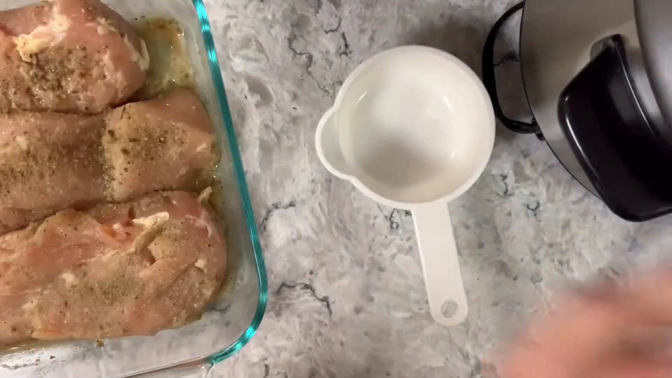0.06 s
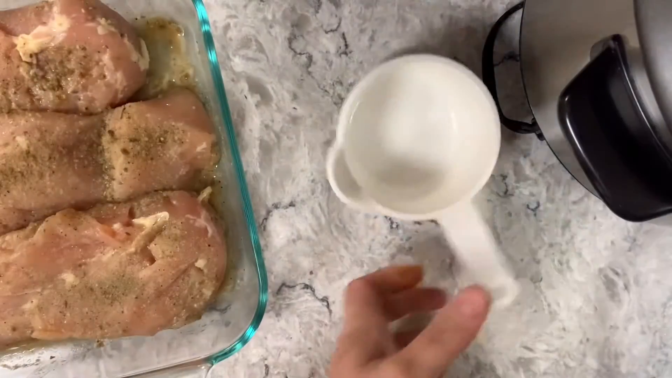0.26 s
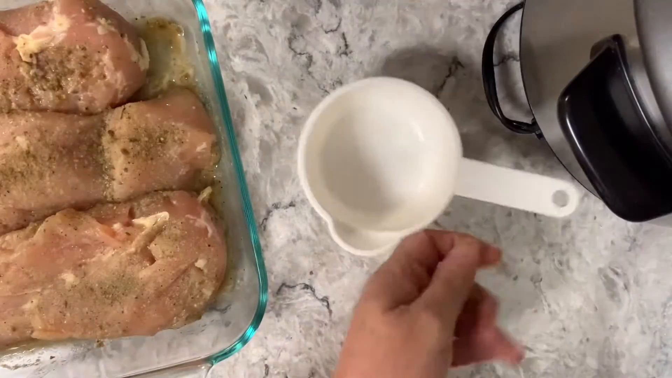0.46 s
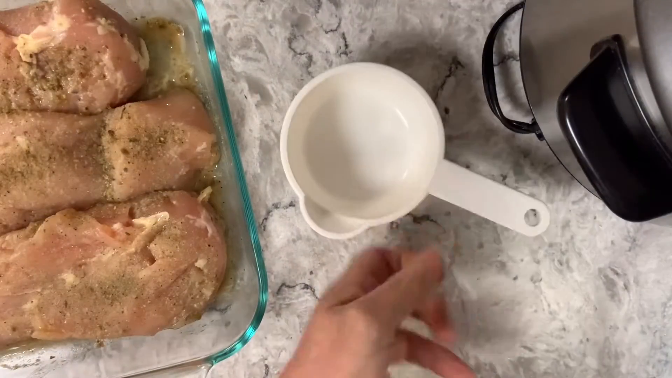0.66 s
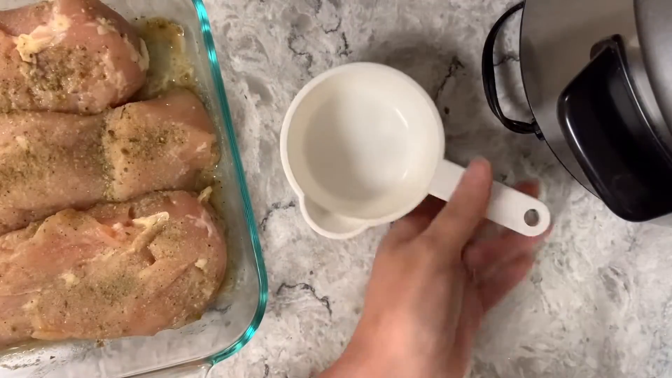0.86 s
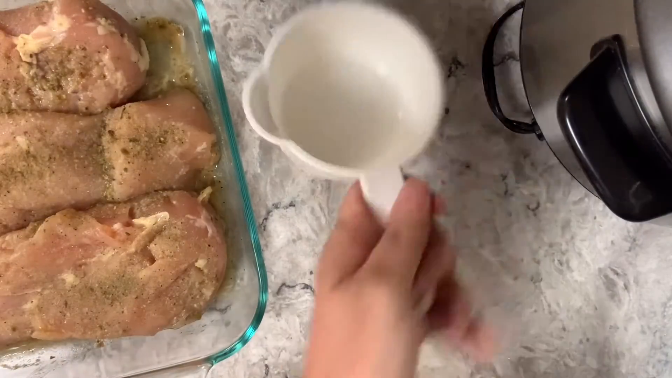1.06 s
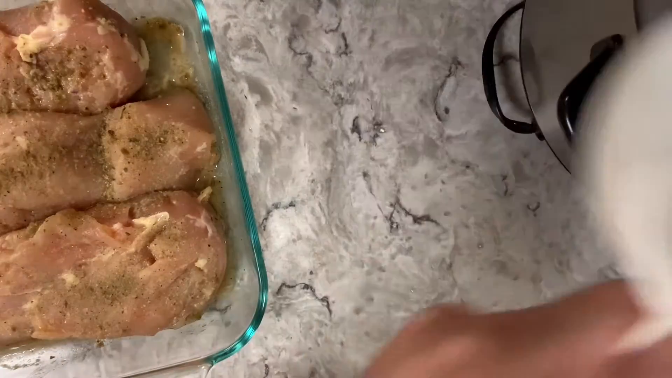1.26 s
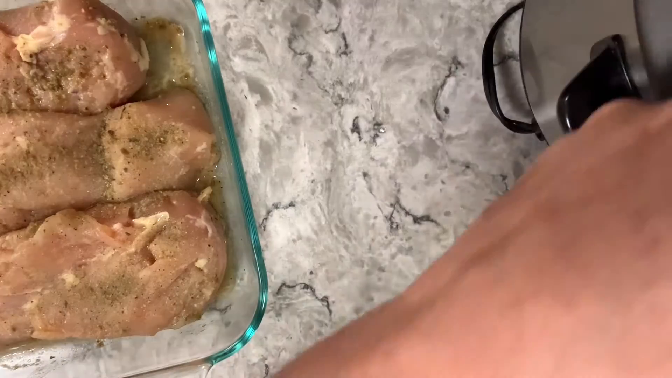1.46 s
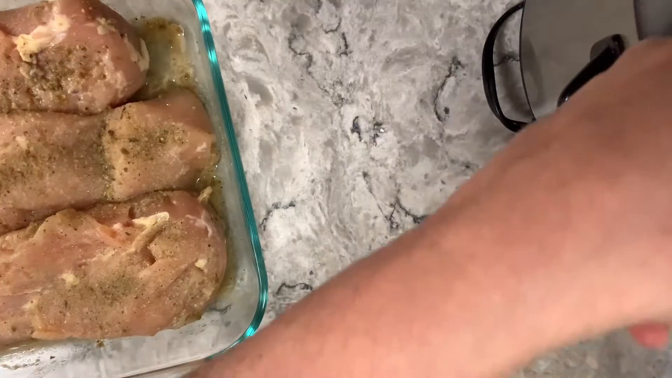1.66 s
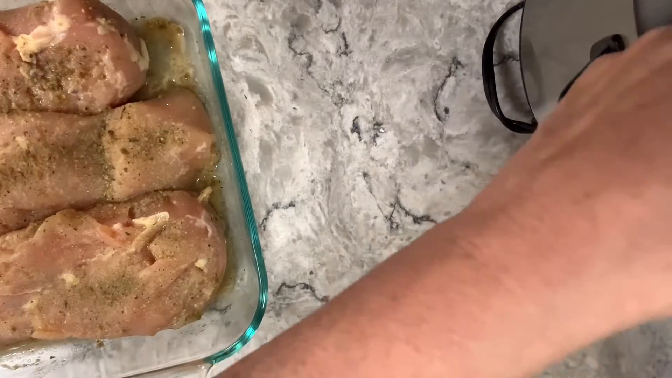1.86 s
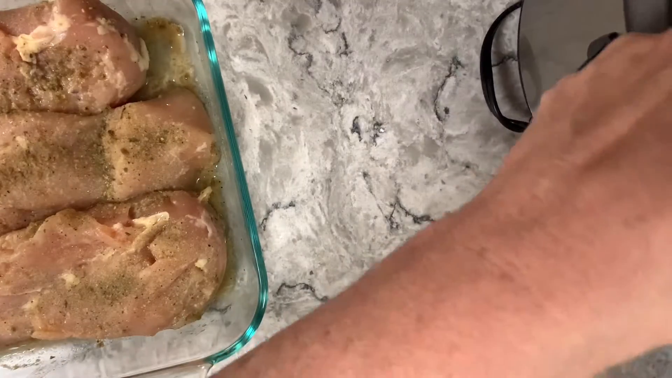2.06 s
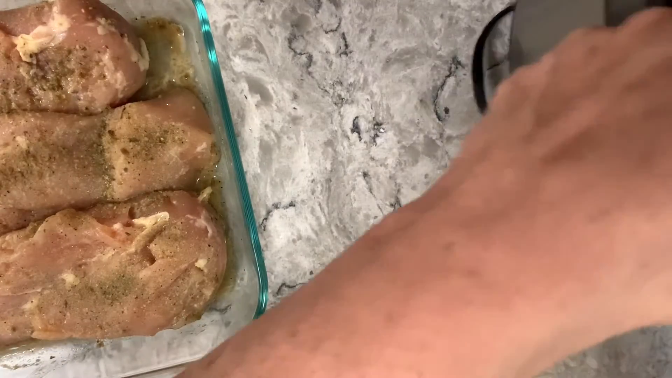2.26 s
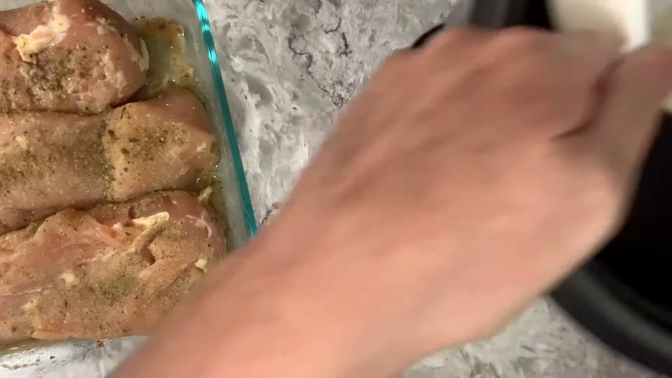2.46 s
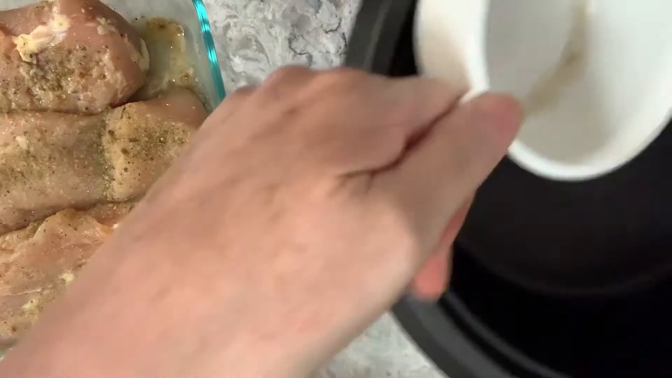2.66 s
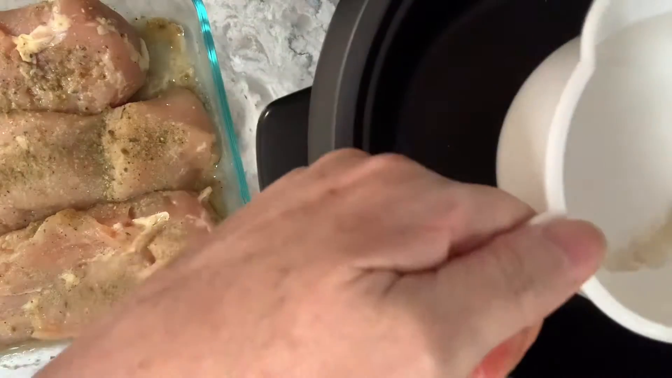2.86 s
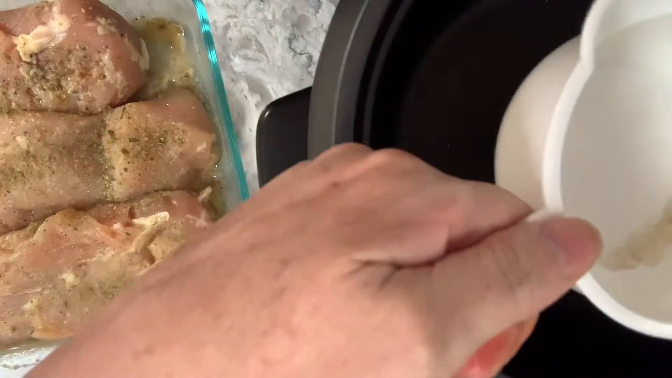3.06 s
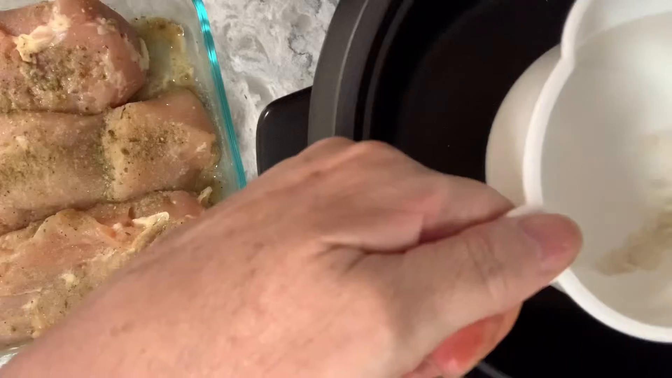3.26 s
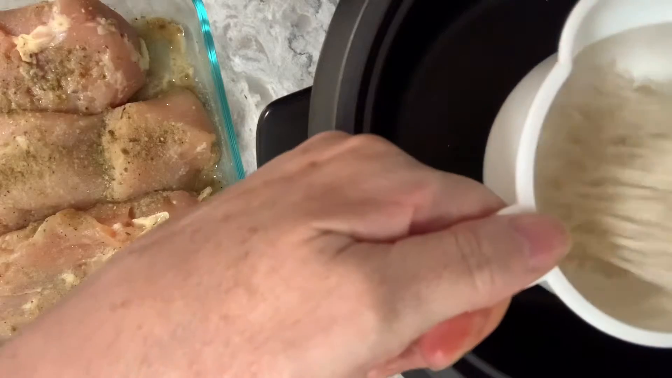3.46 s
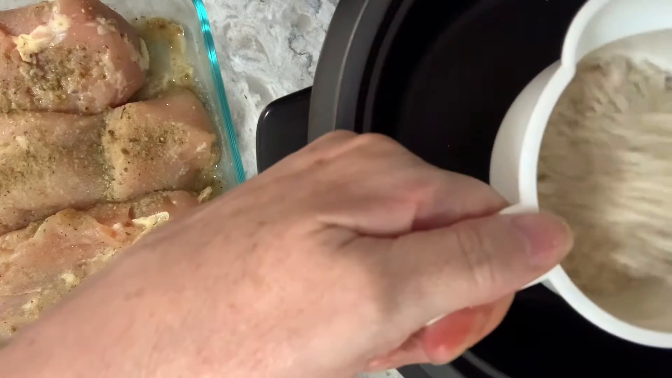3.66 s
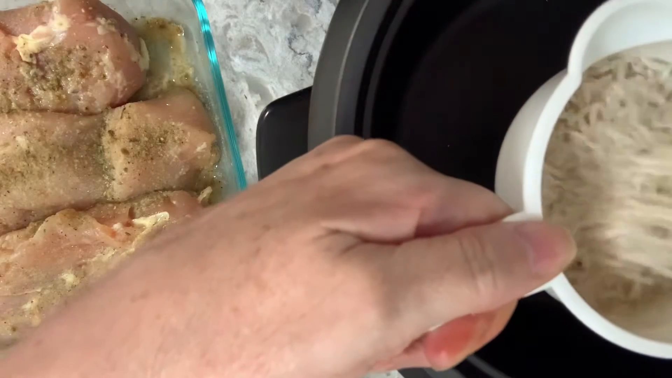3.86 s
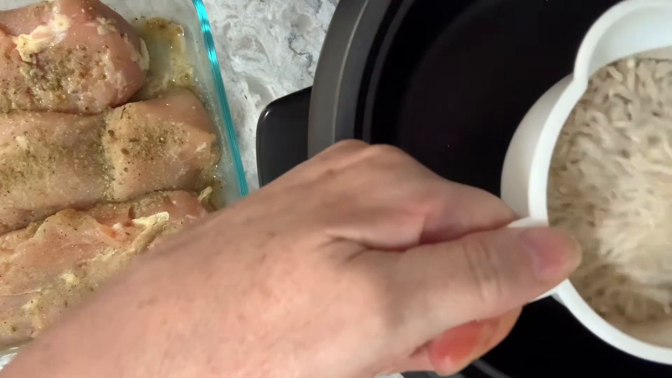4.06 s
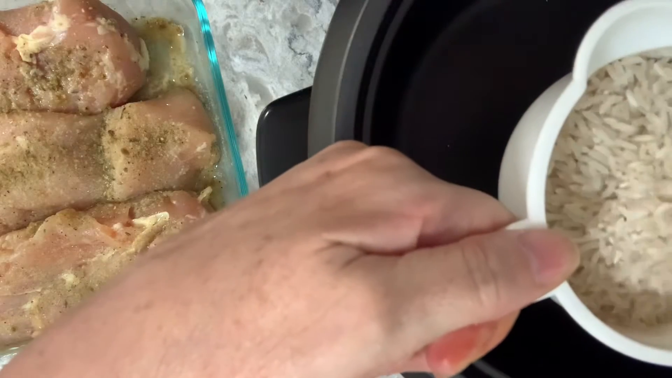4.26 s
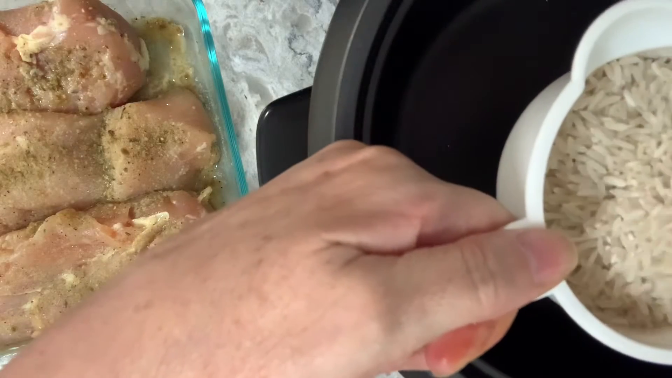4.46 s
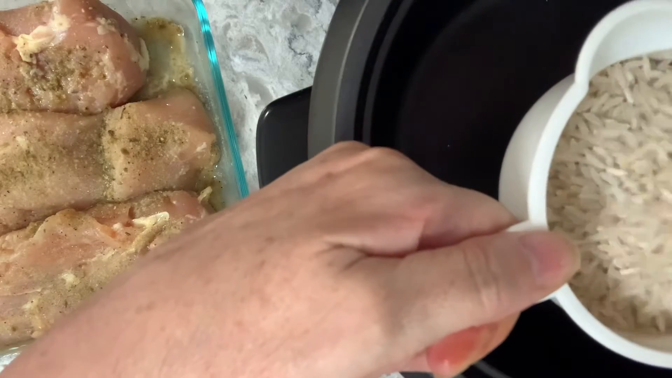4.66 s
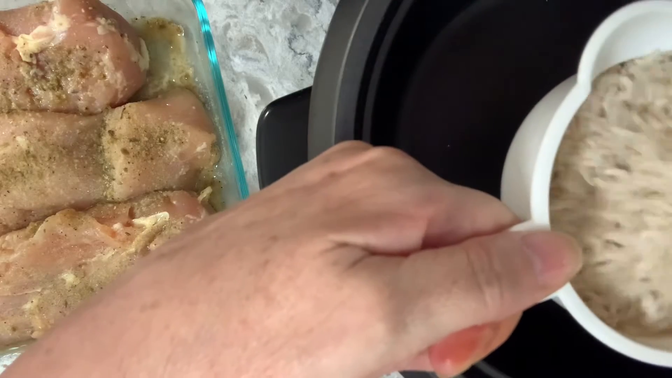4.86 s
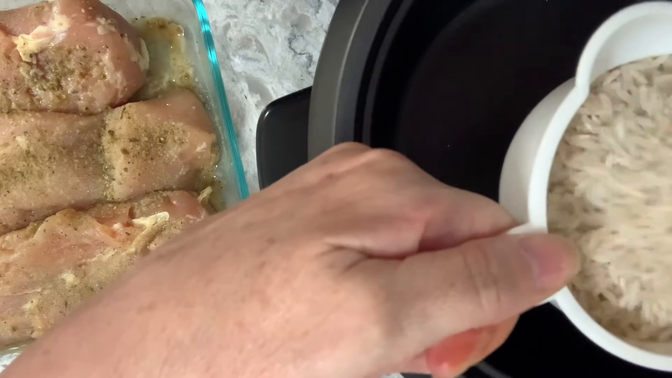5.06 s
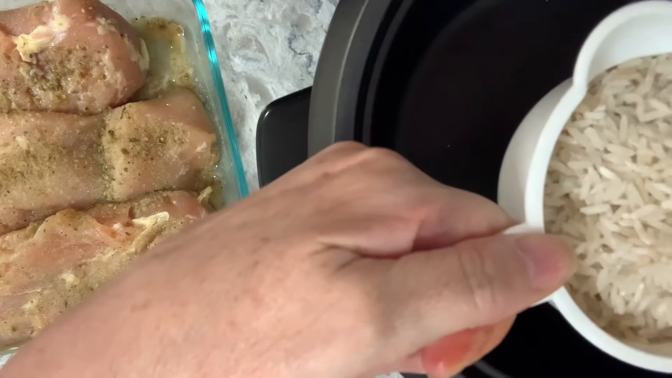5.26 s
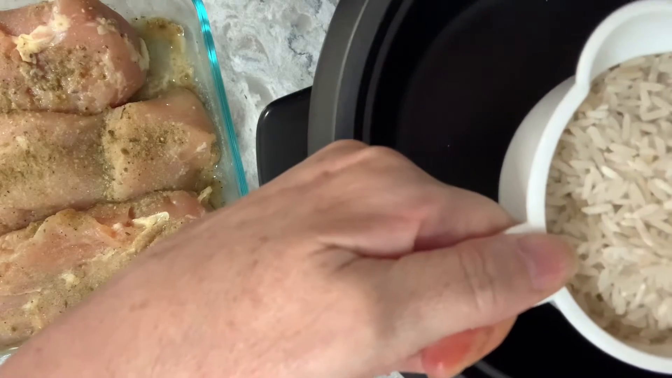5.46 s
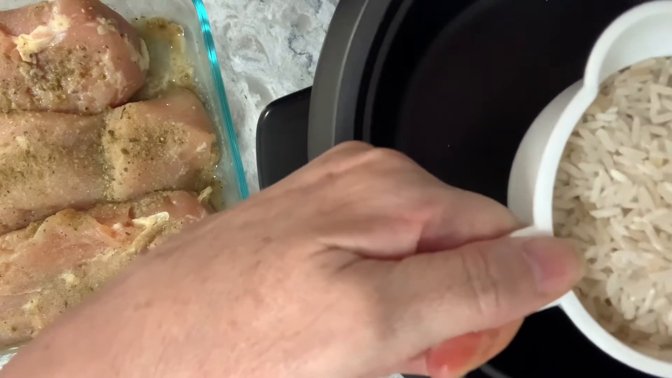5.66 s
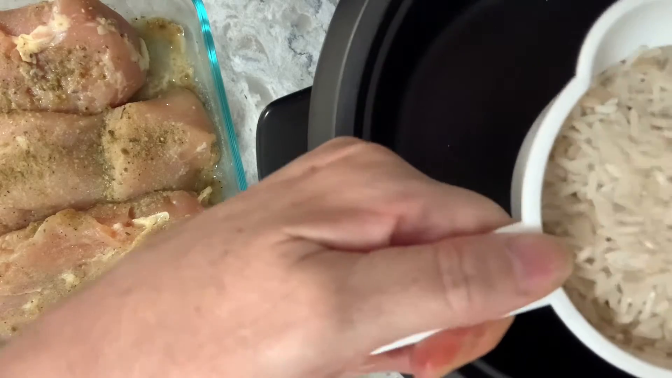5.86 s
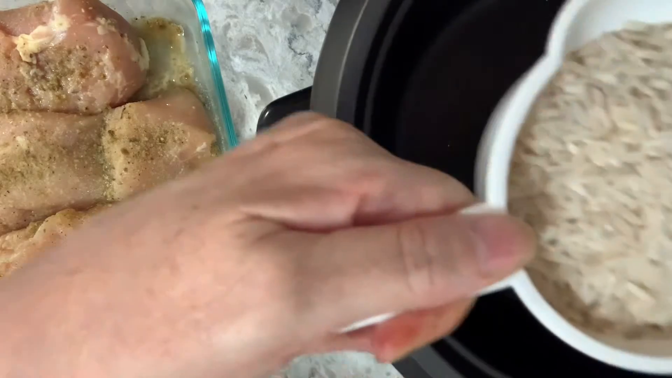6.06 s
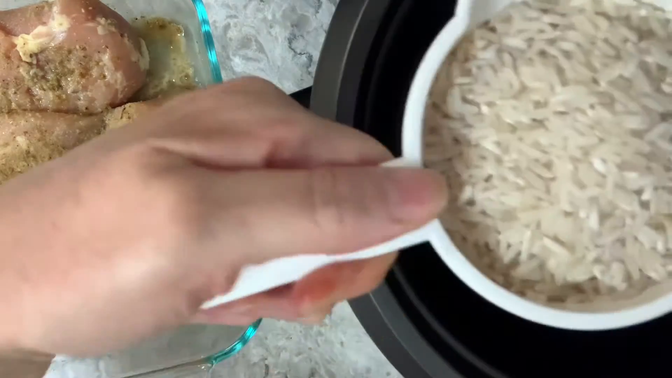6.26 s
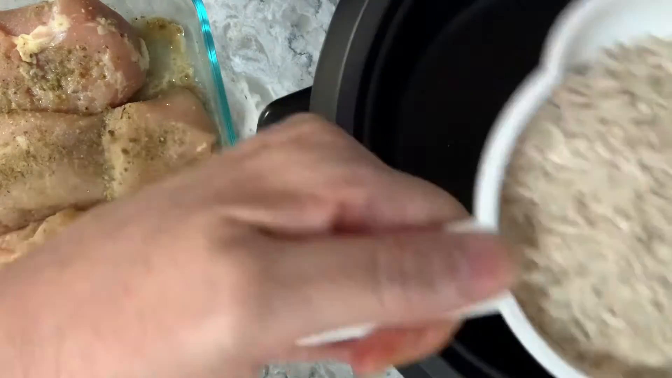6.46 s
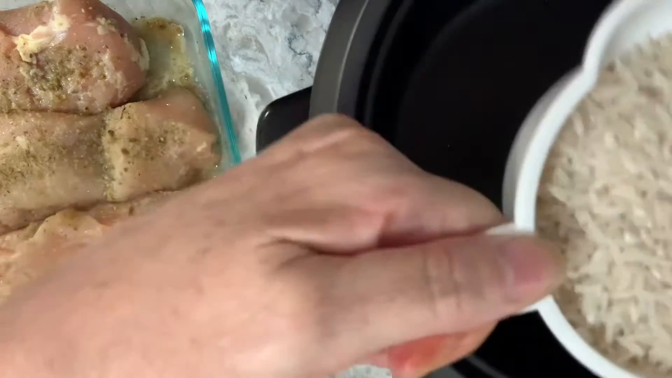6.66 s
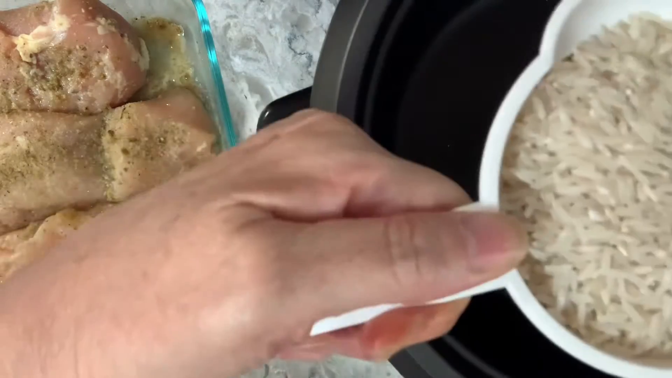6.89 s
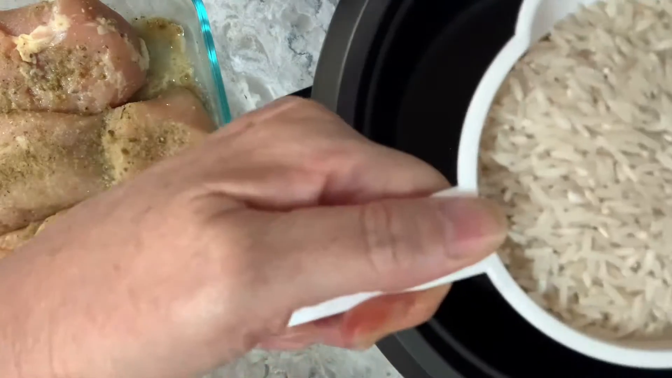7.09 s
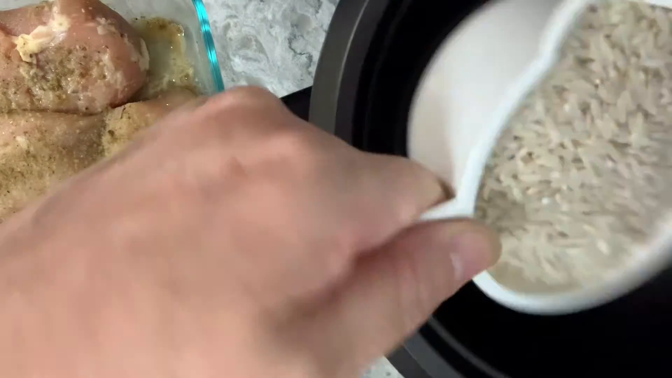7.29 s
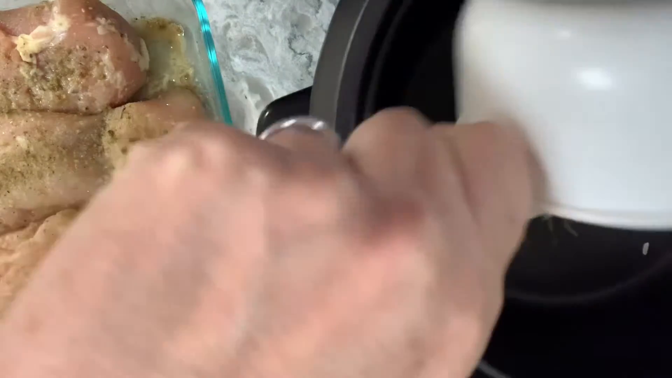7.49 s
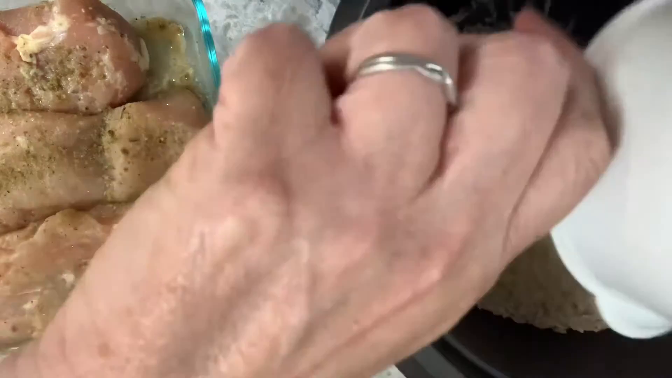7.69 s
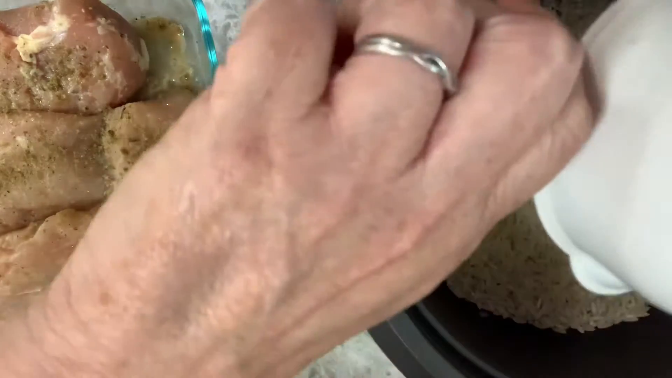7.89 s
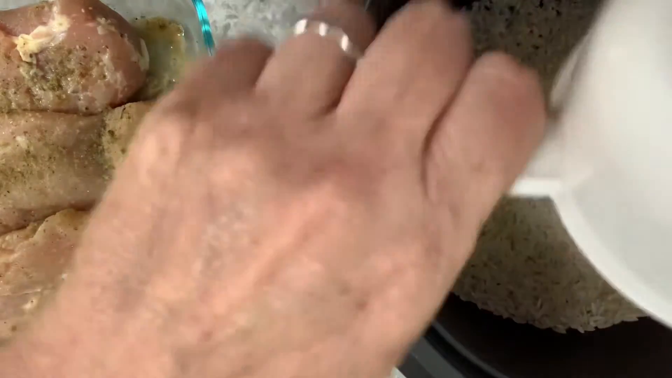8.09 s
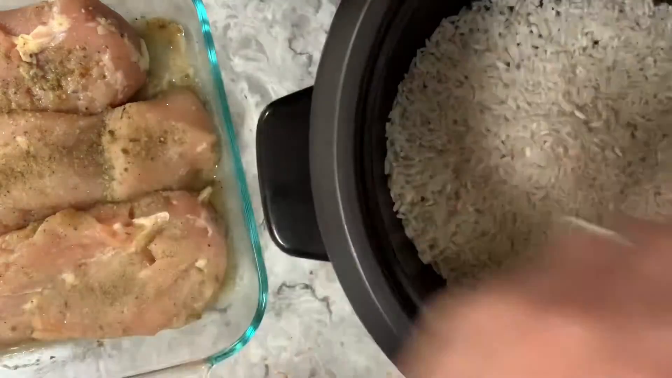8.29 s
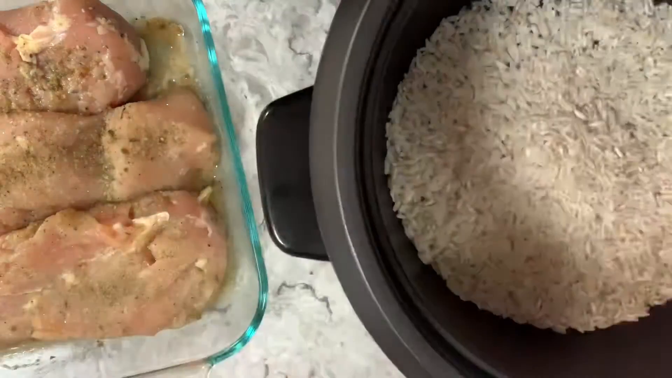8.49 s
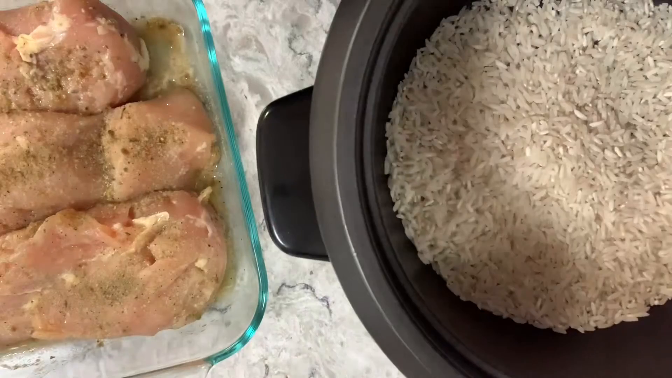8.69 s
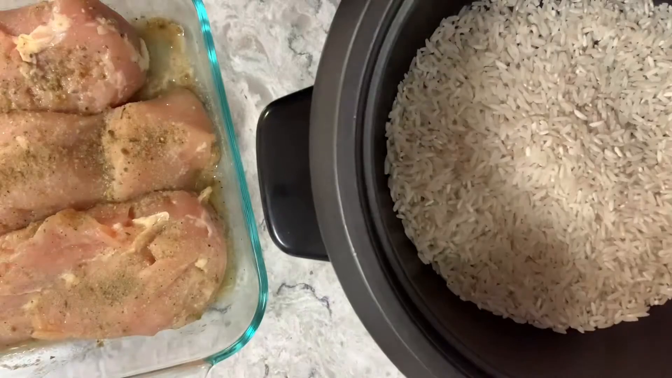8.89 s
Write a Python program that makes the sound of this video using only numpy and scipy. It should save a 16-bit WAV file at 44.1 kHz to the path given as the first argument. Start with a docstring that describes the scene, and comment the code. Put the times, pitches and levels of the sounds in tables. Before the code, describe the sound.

A faint, low rumble of a quiet kitchen runs throughout, and everything is heard close up. From about 0.2 seconds a plastic measuring cup rocks on a stone counter, clatters flat at 0.4 and slides faintly. At 1.7 a little dry rice rattles into it. A rice cooker bumps loudly at 1.9 and is dragged in two shoves, its feet sticking and slipping, until about 2.9. The cup takes dry knocks at 2.4 and 3. From 3.1 a stream of rice rings the hollow cup, dulling after 3.5 to a soft patter that thins out by 6.5, with a light knock at 5.7. At 7.4 the cupful lands in the cooker's metal pot with a loud, bright hiss and a brief ring, quickly damped by the heap, and a soft bump. A few last grains tick until about 8.3 seconds.

```python
"""A plastic measuring cup clatters on a stone counter, over the faint rumble of a quiet kitchen.
A little dry rice rattles into it, and a rice cooker is dragged closer on feet that stick and slip.
Then a stream of rice rings the cup and dulls to a patter as the grains cover its bottom.
Last, the cupful is tipped into the cooker's metal pot, which rings until the heap damps it.
A phone with two microphones hears it all from close by."""
import sys
import numpy as np
from scipy import signal
from scipy.fft import rfft, irfft, next_fast_len
from scipy.io import wavfile
from scipy.ndimage import uniform_filter1d

SR = 44100
rng = np.random.default_rng(int(sys.argv[2]) if len(sys.argv) > 2 else 0)


def store_wav(level_fs):
    """Save 16-bit WAV to argv[1]."""
    pcm = np.round(np.clip(np.atleast_2d(level_fs), -1, 1) * 32767)
    wavfile.write(sys.argv[1], SR, pcm.T.astype(np.int16))


N = 393930
TIME = np.arange(N) / SR
AGE = TIME[:SR // 3]  # seconds since a hit began


def undb(db):
    """Turn decibels into a number to multiply by."""
    return np.exp(np.asarray(db) * (np.log(10) / 20))


def unit(x):
    """Scale a sound to an average power of 1."""
    return x / np.sqrt(np.mean(x ** 2))


def fade(t60):
    """A fade that drops by 60 dB in t60 seconds."""
    return undb(-60 * AGE / t60)


def swells(rows, attack_s, sag_db_per_s, release_db_per_s):
    """The loudness of movements that build up, weaken as they last, then die away."""
    out = np.zeros(N)
    for start, length, db in rows:
        span = slice(int(start * SR), int(start * SR) + 2 * SR)
        age = np.maximum(TIME[span] - start, 0)
        level_db = db - sag_db_per_s * age - release_db_per_s * np.maximum(age - length, 0)
        out[span] += np.minimum(age / attack_s, 1) * undb(level_db)
    return out


def over_pitch(points, hz):
    """Read between the rows of a table, giving each octave equal room."""
    pitch, value = np.transpose(points)
    return np.interp(np.log(hz + 1), np.log(pitch), value)


def colour(x, tone, size=2048):
    """Give a sound a tone: the table says how strong each pitch is next to the others."""
    gain = undb(over_pitch(tone, np.fft.rfftfreq(size, 1 / SR)))
    cepstrum = irfft(np.log(gain))
    # folding this in half keeps the filter from sounding before the hit
    cepstrum[1:size // 2] *= 2
    cepstrum[size // 2 + 1:] = 0
    response = irfft(np.exp(rfft(cepstrum)))
    return signal.oaconvolve(x, response[None] / np.linalg.norm(response), axes=1)[:, :x.shape[1]]


def resonate(x, notes, size=4096):
    """Let a sound ring an object's notes; the wider a note, the sooner it dies."""
    t = AGE[:size]
    response = np.zeros(size)
    for k, (hz, width, db) in enumerate(notes):
        decay = undb(db) * np.sqrt(width) * np.exp(-np.pi * width * t)
        response += decay * np.sin(2 * np.pi * hz * t + k * np.pi / 2)
    return signal.oaconvolve(x, response[None] / np.linalg.norm(response), axes=1)[:, :N]


def wander(rate):
    """A smooth random drift of about 1 either way, turning `rate` times a second."""
    hold = max(int(SR / rate), 1)
    steps = np.repeat(rng.standard_normal(N // hold + 1), hold)[:N]
    return unit(uniform_filter1d(steps, hold))


def add(out, start_s, sound):
    """Mix a sound in at the given time."""
    i = int(start_s * SR)
    out[:, i:i + sound.shape[1]] += sound[:, :N - i]


def cracks(rows, tone, t60, rise_s):
    """Short bursts of noise, made as two things touch."""
    out = np.zeros((2, N))
    shape = fade(t60) * (1 - np.exp(-AGE / rise_s))
    for start, db in rows:
        add(out, start, 0.46 * undb(db) * shape / shape.max() * rng.standard_normal((2, len(AGE))))
    return colour(out, tone)


def blows(rows, notes, focus_db, tone, crack_t60, rise_s):
    """Each blow cracks and rings the notes near its centre pitch; a softer blow rings fewer of them."""
    hz, note_db, t60 = np.transpose(notes)
    decay = np.array([fade(t) for t in t60]) * (1 - np.exp(-AGE / rise_s))
    signs = (-1) ** np.arange(len(hz))
    out = cracks([(start, db) for start, _, _, db in rows], tone, crack_t60, rise_s)
    for start, ring_db, centre_hz, crack_db in rows:
        softness = 1.5 + max(ring_db - crack_db, 0) / 21.5  # a weak crack means a soft blow
        gain = signs * undb(note_db - focus_db * softness * np.log2(hz / centre_hz) ** 2)
        detuned_hz = hz * (1 + 0.0047 * rng.standard_normal(len(hz)))
        angle = 2 * np.pi * np.outer(detuned_hz, AGE).astype(np.float32)
        ring = np.array([gain @ (decay * np.sin(angle)), gain @ (decay * np.cos(angle))])
        add(out, start, undb(ring_db) * ring / np.abs(ring[0]).max())
    return out


def tiny_hits(rate, scatter_db, clump_db, clump_rate, rattle_t60):
    """About `rate` uneven hits a second, each with a brief rattle, swelling in random clumps."""
    chance = np.minimum(rate / SR, 1)
    size = undb(scatter_db * np.minimum(rng.exponential(size=N), 4))
    hits = rng.random(N) < chance
    power = signal.oaconvolve(hits * size ** 2 / chance, fade(rattle_t60) ** 2)[:N]
    rattle = np.sqrt(np.abs(power)) * rng.standard_normal((2, N))
    return unit(rattle * undb(clump_db * wander(clump_rate)))


# The tone of the kitchen's background. Each row: pitch in Hz, strength in dB.
KITCHEN_TONE = [(25, -19), (40, -7), (58, 4), (80, -1), (120, 0), (210, -1), (350, -6), (600, -17),
                (900, -19), (1700, -30), (4000, -36), (9000, -38), (15500, -42)]


def kitchen_rumble():
    """A faint, low noise that wavers a little and never stops."""
    level_db = -57.5 + .7 * wander(5.1)
    return undb(level_db) * colour(rng.standard_normal((2, N)), KITCHEN_TONE)


# The cup rocks. Each row: start in seconds, ring level in dB, centre pitch in Hz, crack level in dB.
CUP_ROCKING = [(.188, -42, 1250, -32.5), (.204, -37.5, 150, -50), (.209, -37, 1300, -50),
               (.219, -28.5, 1230, -40), (.348, -27.5, 950, -37.5), (.361, -30, 300, -43),
               (.389, -38, 1000, -46), (.402, -36, 1300, -40), (.409, -17, 1700, -18),
               (.419, -21, 1300, -22), (.429, -25, 1400, -37)]
# The notes of the cup on stone. Each row: pitch in Hz, strength in dB, fade time in seconds.
CUP_ON_STONE_NOTES = [(113, -2, 0.11), (212, -5, .1), (530, -6, 0.034), (874, -3.5, 0.032),
                      (1043, -2.5, 0.033), (1184, -5, .03), (1300, -4, 0.042), (1400, -4, .035),
                      (1500, -5.5, 0.032), (1850, -2, 0.026), (2130, -6, 0.023), (2430, -3.5, 0.032),
                      (2720, -9.5, .03), (4000, -4, .03)]
# The tone of plastic touching stone. Each row: pitch in Hz, strength in dB.
STONE_TONE = [(150, -24), (650, -12), (1000, 0), (1500, -2.5), (2400, -5), (3400, -8.5), (5500, -5.5),
              (8000, -10), (11000, -13.5), (15500, -24)]
# The cup slides. Each row: start in seconds, length in seconds, level in dB.
SLIDES = [(.44, .4, -57), (.86, 0.33, -55.5)]


def cup_on_counter():
    """The nudged cup rocks on the stone, drops flat so that its base rings, then slides."""
    clatter = blows(CUP_ROCKING, CUP_ON_STONE_NOTES, focus_db=1.5, tone=STONE_TONE,
                    crack_t60=0.078, rise_s=0.00054)
    base_hz, base_db, base_rise_s = 863, -22.5, 0.011
    shape = undb(base_db) * fade(t60=.12) * (1 - np.exp(-AGE / base_rise_s))
    note = np.sin(2 * np.pi * base_hz * AGE + np.array([[0], [np.pi / 2]]))
    base = np.zeros((2, N))
    add(base, start_s=.416, sound=shape * note)
    sliding = swells(SLIDES, attack_s=0.014, sag_db_per_s=39, release_db_per_s=120)
    friction = colour(rng.standard_normal((2, N)), STONE_TONE) * undb(1.3 * wander(37))
    return clatter + base + sliding * friction


COVER_STARTS_S, COVER_TAKES_S, FILL_TAKES_S = 3.41, 0.35, 2


def covered(seconds):
    """How much of the cup's bottom lies under rice, from 0 to 1."""
    return np.clip((seconds - COVER_STARTS_S) / COVER_TAKES_S, 0, 1)


# Short spurts of rice. Each row: start in seconds, length in seconds, level in dB.
RICE_DRIBBLES = [(1.669, .075, -25.5), (1.781, .05, -37), (1.94, 0.027, -35.5), (2.04, .07, -43),
                 (2.15, .2, -57.5), (6.39, 0.031, -46), (6.5, 0.083, -54.5)]
# The main pour. Each row: time in seconds, level in dB.
RICE_STREAM = [(3.19, -46.5), (3.29, -23.5), (3.41, -22.5), (3.56, -40.5), (3.7, -37.5), (3.8, -41.5),
               (3.87, -38), (4.22, -49), (4.33, -45.5), (4.43, -46.5), (4.53, -53), (4.8, -45), (4.95, -49),
               (5.25, -56.5), (5.3, -47.5), (5.42, -49), (5.47, -53), (5.58, -51.5), (5.68, -59),
               (5.96, -56.5), (6.04, -81)]
# The tone of rice landing on plastic, and on other rice. Each row: pitch in Hz, strength in dB.
ON_PLASTIC_TONE = [(200, -32.5), (700, -28.5), (1800, -18), (2400, -12.5), (2850, -10), (3600, -12.5),
                   (4700, -2.5), (7000, -4.5), (8500, -2.5), (12300, 0), (15500, -4.5)]
ON_RICE_TONE = [(200, -15), (700, -10), (1350, -10), (1750, -21), (2700, -10), (3700, -7.5), (5200, -2),
                (6100, 2), (7200, -2.5), (8800, -1), (12000, 1), (15500, -5.5)]
# The notes of the cup's bottom, the whole empty cup and the cup with rice in it.
# Each row: pitch in Hz, width in Hz, strength in dB.
CUP_BOTTOM_NOTES = [(1170, 55, -0.5), (2004, 70, -16), (2930, 120, -14.5)]
EMPTY_CUP_NOTES = [(890, 90, -14), (990, 50, -6.5), (1060, 90, -2.5), (1160, 90, -4), (1250, 66, 0),
                   (1400, 110, -8), (1700, 40, -23), (2130, 71, -19), (2400, 80, -15), (2890, 140, -10.5),
                   (3210, 70, -18.5), (4000, 140, -15), (4600, 120, -10.5), (5150, 180, -11)]
FILLED_CUP_NOTES = [(850, 130, -3), (1120, 300, -1.5), (1336, 160, 4), (1850, 250, -12), (2970, 450, -9)]


def rice_into_cup():
    """A stream rings the whole cup, a dribble only its bottom; a weaker flow has fewer grains."""
    times, levels_db = np.transpose(RICE_STREAM)
    stream = undb(np.interp(TIME, times, levels_db, left=-150, right=-150))
    dribbles = swells(RICE_DRIBBLES, attack_s=0.0072, sag_db_per_s=10, release_db_per_s=401)
    flow = stream + dribbles
    grains_per_s = 500 + 3000 * np.sqrt(flow / flow.max())
    patter = tiny_hits(grains_per_s, scatter_db=2.8, clump_db=1.1, clump_rate=63, rattle_t60=0.013)
    bounces = tiny_hits(rate=23, scatter_db=2, clump_db=1, clump_rate=11, rattle_t60=.012)
    # rice soon covers the plastic, and later grains land on rice
    cover = covered(TIME)
    on_plastic = np.sqrt(1 - cover) * colour(patter, ON_PLASTIC_TONE)
    on_rice = np.sqrt(cover) * colour(patter + undb(-9) * bounces, ON_RICE_TONE)
    empty_ring = np.sqrt(1 - cover) * resonate(patter, EMPTY_CUP_NOTES)
    filled_ring = np.sqrt(cover) * resonate(patter, FILLED_CUP_NOTES)
    ringing = stream * (empty_ring + filled_ring) + dribbles * resonate(patter, CUP_BOTTOM_NOTES)
    # such a small cup gives off little bass
    hollow = signal.sosfilt(signal.butter(4, 820, "high", fs=SR, output="sos"), ringing)
    depth = np.maximum(TIME - COVER_STARTS_S, 0) / FILL_TAKES_S
    ring_db = -3 - 12 * cover - 6.5 * depth ** 2  # the rising heap muffles the ring
    return flow * undb(1.05) * (on_plastic + on_rice) + undb(ring_db) * hollow


# Clumps of grains land. Each row: start in seconds, level in dB.
RICE_CLUMPS = [(1.6736, -14), (1.6855, -15), (1.704, -12), (1.7221, -12), (1.7491, -13), (1.7811, -12),
               (1.9476, -20), (1.973, -23), (3.1396, -17.5), (3.159, -27), (3.1815, -31), (3.1952, -10),
               (3.211, -18), (3.222, -16), (3.243, -12), (3.2625, -8), (3.279, -11), (3.323, -8),
               (3.347, -11.5), (3.383, -11), (3.5806, -26), (3.597, -23), (3.6403, -10), (3.733, -14),
               (3.7789, -21), (3.946, -26), (4.2408, -28.5), (4.3354, -32), (4.555, -25), (4.6608, -29),
               (4.8344, -28), (4.9625, -35), (5.0013, -32), (5.124, -38.5), (5.2846, -29.5), (5.3593, -36),
               (5.383, -32), (5.432, -34), (5.5132, -33), (5.5731, -32), (5.6255, -36), (5.8935, -31.5),
               (5.9303, -37), (5.9544, -31.5), (6.1399, -36), (6.2243, -44), (6.3555, -33.5), (7.7782, -14),
               (7.807, -26), (7.8747, -27.5), (7.92, -41), (7.946, -44), (8.2618, -42)]
# The notes of the cup when tapped. Each row: pitch in Hz, strength in dB, fade time in seconds.
TAPPED_CUP_NOTES = [(260, -9, .06), (530, -12, .05), (620, -10, .04), (790, -10, .035), (880, -8, .04),
                    (1030, -6, .04), (1150, 0, .05), (1160, -33, .15), (1255, -7, .045), (1390, -14, .035)]
# The tone of a tick on the heap in the pot. Each row: pitch in Hz, strength in dB.
HEAP_TONE = [(300, -36), (2500, -21), (5500, -13.5), (7500, -4.5), (11000, 3), (15500, -7)]
POT_POUR_S = 7.418  # from here on, rice falls into the pot


def rice_clumps():
    """Clumps ring the cup while its bottom is bare; on rice, in the cup or the pot, they only tick."""
    centre_hz = 1350
    on_plastic = [(s, db - 13, centre_hz, db - 1.5) for s, db in RICE_CLUMPS if covered(s) == 0]
    on_rice = [(s, db - 0.5) for s, db in RICE_CLUMPS if covered(s) > 0 and s < POT_POUR_S]
    in_pot = [(s, db - 0.5) for s, db in RICE_CLUMPS if s >= POT_POUR_S]
    taps = blows(on_plastic, TAPPED_CUP_NOTES, focus_db=10.5, tone=ON_PLASTIC_TONE,
                 crack_t60=0.029, rise_s=.0005)
    cup_ticks = cracks(on_rice, ON_RICE_TONE, t60=0.026, rise_s=0.00026)
    pot_ticks = cracks(in_pot, HEAP_TONE, t60=0.025, rise_s=.0003)
    return taps + cup_ticks + pot_ticks


# The cooker bumps. Each row: start in seconds, ring level in dB, centre pitch in Hz, crack level in dB.
COOKER_BUMPS = [(1.835, -20.5, 500, -46), (1.8735, -3.5, 520, -11), (1.8738, -13, 3410, -25),
                (1.8802, -12, 290, -17), (1.897, -18, 170, -32), (2.033, -19, 600, -23),
                (2.141, -23, 385, -31), (2.346, -24.5, 372, -48), (2.375, -26, 685, -54),
                (2.400, -23, 380, -37.5), (2.411, -22, 180, -45), (2.584, -29.5, 636, -50),
                (2.633, -19, 691, -40), (2.745, -24, 400, -37), (2.772, -30.5, 125, -60),
                (2.828, -37, 617, -62.5), (2.86, -37, 109.7, -61), (2.99, -38, 80.9, -65.5),
                (7.515, -33, 301, -57), (7.537, -19.5, 380, -48), (7.572, -31, 330, -55)]
# The notes of its shell. Each row: pitch in Hz, strength in dB, fade time in seconds.
SHELL_NOTES = [(75, -8, .3), (122, -8, .22), (204, -11, .18), (270, -4, .06), (301, -2.5, .14),
               (345, -3, .035), (390, -6, .11), (428, -6, .05), (481, -7, .04), (539, -10, .08),
               (589, -8, .04), (642, -4, .045), (678, -4, .07), (720, -7, .05), (855, -10, .09),
               (934, -9, .05), (1000, -10, .05), (1442, -10, .1), (1852, -8, .12), (2220, -1, .07),
               (2825, -13, .15), (3460, -9, .07), (3870, 1, .04), (4226, -10, .15), (4610, -3, .06),
               (5700, -6, .045)]
# The tone of a bump, and of the rubbing feet. Each row: pitch in Hz, strength in dB.
BUMP_TONE = [(150, 0.5), (1000, 1), (2500, -1.5), (3900, -2.5), (6000, -1.5), (8000, -2), (11500, -3.5),
             (15500, -14.5)]
RUB_TONE = [(40, -31), (90, 0), (200, -2.5), (350, -4), (680, -2), (1000, -12.5), (1450, -16.5),
            (2000, -14.5), (4000, -22), (8000, -28.5), (15000, -52)]
# Two shoves move the cooker. Each row: start in seconds, length in seconds, level in dB.
COOKER_SHOVES = [(1.84, 0.47, -34), (2.33, 0.48, -34)]


def dragged_cooker():
    """The cooker bumps, its feet stick and slip on the counter, and its shell drones along."""
    bumps = blows(COOKER_BUMPS, SHELL_NOTES, focus_db=4.5, tone=BUMP_TONE, crack_t60=0.078, rise_s=.0009)
    slips = tiny_hits(rate=1100, scatter_db=0, clump_db=3.0, clump_rate=45, rattle_t60=0.035)
    effort = swells(COOKER_SHOVES, attack_s=.06, sag_db_per_s=32, release_db_per_s=88.5)
    rubbing = colour(slips, RUB_TONE)
    # turn each note's fade time into a width in Hz
    shell = [(hz, np.log(1000) / (np.pi * t60), db) for hz, db, t60 in SHELL_NOTES]
    drone = unit(resonate(rubbing, shell))
    return bumps + effort * (undb(-2.5) * rubbing + undb(-6) * drone)


# The held cup scrapes. Each row: start in seconds, length in seconds, level in dB.
SCRAPES = [(2.44, 0.16, -59), (2.6, .03, -42), (2.972, .015, -43.5)]
# It is knocked. Each row: start in seconds, ring level in dB, centre pitch in Hz, crack level in dB.
KNOCKS = [(2.445, -13.5, 746, -29), (2.989, -9.5, 850, -15), (2.998, -16, 1200, -39),
          (5.720, -24, 600, -42), (8.11, -54.5, 895, -54)]
# The tone of those cracks. Each row: pitch in Hz, strength in dB.
KNOCK_TONE = [(150, -20), (700, -2), (1300, -0.5), (2500, -9), (3700, -12), (4700, 0), (6000, -7),
              (8000, -9), (11000, -16.5), (15500, -23.5)]


def cup_in_hand():
    """The held cup scrapes along the cooker and takes a few dry knocks."""
    knocks = blows(KNOCKS, TAPPED_CUP_NOTES, focus_db=2.5, tone=KNOCK_TONE, crack_t60=0.032, rise_s=.0005)
    scraping = swells(SCRAPES, attack_s=.015, sag_db_per_s=19.5, release_db_per_s=400.5)
    return knocks + scraping * resonate(rng.standard_normal((2, N)), EMPTY_CUP_NOTES)


# The notes of the pot's metal wall.
# Each row: pitch in Hz, strength in dB when hit on the side, strength in dB when hit on the bottom.
WALL_NOTES = [(2800, -28, -9), (2935, -17, -10), (3460, -16, -10), (4228, -8, -4), (4560, -15, -9),
              (5088, -14, -7), (5545, -10, -7), (5780, -14, -9), (6022, -5, -11), (6592, -5, -2),
              (7045, -16, -6), (7245, -24, -4), (7975, -11, 1), (8090, -3, -2), (8340, -22, -4),
              (8930, 0, 2), (9250, -3, -10), (9992, -22, -3), (10196, -5, -5), (10444, -1, -10),
              (10750, -20, 0), (11350, -18, -3), (11570, -9, -3), (12235, -14, -4), (13275, -18, -4),
              (14435, -11, -3), (15500, -18, -6)]


def pot_wall(hits, struck_on, width_hz):
    """Ring the metal wall; wider, shorter notes stand for more rice lying against it."""
    notes = [(hz, width_hz, side_db if struck_on == "side" else bottom_db)
             for hz, side_db, bottom_db in WALL_NOTES]
    return resonate(hits, notes, size=8192)


# Single grains miss the cup. Each row: start in seconds, level in dB.
STRAY_HITS = [(3.641, -19.5), (3.668, -30), (3.734, -30)]


def stray_grains():
    """Stray grains strike the side of the empty pot, which rings freely."""
    strikes = np.zeros((2, N))
    for start, db in STRAY_HITS:
        add(strikes, start, undb(db) * np.ones((2, 1)))
    ring = pot_wall(strikes, "side", width_hz=9.5)
    return ring * strikes.max() / np.abs(ring).max()


# The cupful lands in lumps. Each row: start in seconds, level in dB.
RICE_SLAPS = [(7.4206, -5.5), (7.434, -6.5), (7.441, -7), (7.506, -12.5)]
# The tone of rice landing in the pot. Each row: pitch in Hz, strength in dB.
ON_POT_TONE = [(300, -28), (1300, -17), (2500, -12.5), (4000, -14), (6000, -9.5), (7700, -6), (9000, -2),
               (10300, -0.5), (12000, -1), (15500, -6.5)]
# The low notes of the pot, bare and filled. Each row: pitch in Hz, width in Hz, strength in dB.
BARE_POT_NOTES = [(325, 50, -19), (600, 56, -0.5), (680, 64, -1.5), (867, 60, -3), (1150, 200, -6.5),
                  (1430, 79, -10.5), (1920, 98, -3.5), (2240, 110, -1.5), (2460, 70, -5.5)]
FILLED_POT_NOTES = [(345, 32, -8.5), (625, 82, 0.5), (845, 70, -4), (1180, 140, 1.5), (1400, 120, -9.5),
                    (1930, 180, -6), (2320, 280, -8)]


def rice_into_pot():
    """The cupful slips out, slaps the bare pot and rings it, until the heap damps the ring."""
    slip, fall = [(7.28, 0.17, -38.5)], [(POT_POUR_S, .36, -35)]  # start and length in seconds, dB
    bare_s, cover_db_per_s, fill_s = 0.036, 112, .16
    shower = tiny_hits(rate=3400, scatter_db=2.0, clump_db=0.7, clump_rate=140, rattle_t60=0.011)
    slipping = swells(slip, attack_s=.025, sag_db_per_s=99.5, release_db_per_s=300)
    flow = swells(fall, attack_s=.008, sag_db_per_s=3.5, release_db_per_s=230)
    # the last grains are too light to ring the pot
    weight = swells(fall, attack_s=.005, sag_db_per_s=6, release_db_per_s=250)
    age = TIME - POT_POUR_S
    # bare metal is louder than the heap, until rice covers it
    bare = undb(17 - cover_db_per_s * np.maximum(age - bare_s, 0))
    hiss = (undb(1.5) + bare) * colour(shower, ON_POT_TONE) * flow
    slaps = cracks(RICE_SLAPS, ON_POT_TONE, t60=0.022, rise_s=.0003)
    # the heap's weight shifts the low notes and shortens the wall's ring
    filled = np.clip(age / fill_s, 0, 1)
    on_metal = flow * bare * shower
    wall = pot_wall(np.sqrt(1 - filled) * on_metal, "bottom", width_hz=28)
    wall += pot_wall(np.sqrt(filled) * on_metal, "bottom", width_hz=90)
    body = (1 - filled) * undb(3.5) * resonate(shower, BARE_POT_NOTES)
    body += filled * undb(-5) * resonate(shower, FILLED_POT_NOTES)
    return slipping * colour(shower, ON_RICE_TONE) + hiss + slaps + undb(-1) * wall + weight * body


def kitchen_echo(x, t60, top_t60, split_hz):
    """The room smears each sound into a short, evenly fading tail, with the very top quieter."""
    noise = rng.standard_normal((2, len(AGE)))
    low = signal.sosfilt(signal.butter(2, split_hz, fs=SR, output="sos"), noise)
    top = signal.sosfilt(signal.butter(2, split_hz, "high", fs=SR, output="sos"), noise)
    tail = (low * fade(t60) + undb(-17) * top * fade(top_t60)) * (1 - np.exp(-AGE / 0.0041))
    return signal.oaconvolve(x, tail / np.linalg.norm(noise[0] * fade(t60)), axes=1)[:, :N]


def scene():
    """Mix the cup, the cooker and the rice with the kitchen's echo and rumble."""
    cup, held, cooker = cup_on_counter(), cup_in_hand(), dragged_cooker()
    rice = rice_into_cup() + rice_clumps() + stray_grains() + rice_into_pot()
    into_room = undb(-7.5) * cup + undb(-16) * held + undb(-10.5) * cooker + undb(-11.5) * rice
    echo = kitchen_echo(into_room, t60=0.31, top_t60=0.29, split_hz=14000)
    return cup + held + cooker + rice + echo + kitchen_rumble()


# How alike the two microphones sound. Each row: pitch in Hz, likeness from 0 to 1.
MIC_LIKENESS = [(30, .8), (100, .91), (300, .94), (1200, .85), (1900, .25), (4000, .15), (5600, .5),
                (7500, .85), (10000, .95), (16000, .95)]
# How much louder the right one is. Each row: pitch in Hz, boost in dB.
RIGHT_BOOST = [(100, -2.1), (500, -0.5), (1100, 0.5), (2200, 3.5), (4500, 1.5), (8000, 0), (16000, 0)]
RIGHT_LAG_MS, TOP_HZ = .264, 15800


def record(dry):
    """Two microphones share the bass; treble reaches the right one later; the very top is cut."""
    size = next_fast_len(N + SR // 20)
    shared, diffuse = rfft(dry, size)  # one channel is common to both sides, the other adds width
    hz = np.fft.rfftfreq(size, 1 / SR)
    alike = np.clip(over_pitch(MIC_LIKENESS, hz), 0, 1)
    mid = shared * np.sqrt((1 + alike) / 2)
    side = diffuse * np.sqrt((1 - alike) / 2)
    lag_s = RIGHT_LAG_MS / 1000 * np.clip((hz - 1500) / 1500, 0, 1)
    lift = undb(over_pitch(RIGHT_BOOST, hz) / 2)
    left = (mid + side) / lift
    right = (mid - side) * lift * np.exp(-2j * np.pi * hz * lag_s)
    stereo = irfft([left, right], size)[:, :N]
    return signal.sosfilt(signal.ellip(10, .2, 70, TOP_HZ, fs=SR, output="sos"), stereo)


dry = scene()
out = record(dry)
store_wav(out)
```